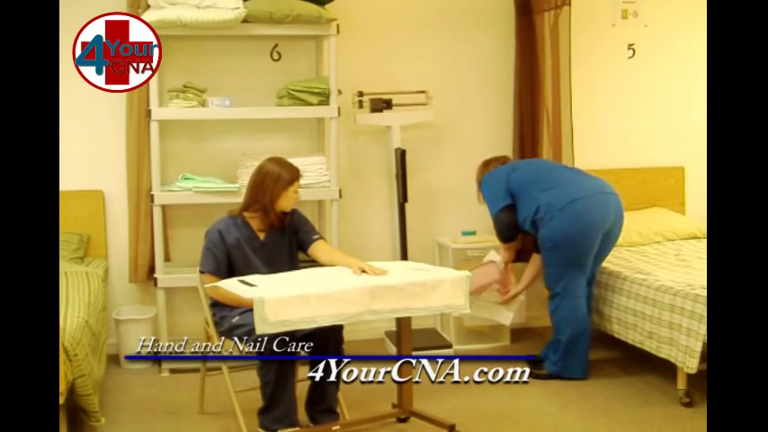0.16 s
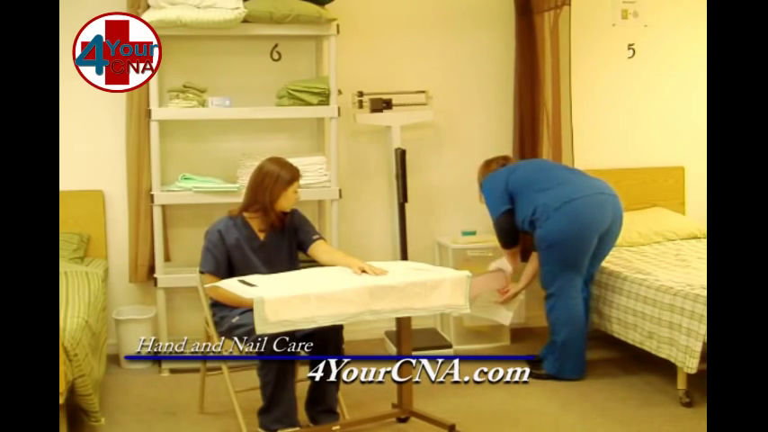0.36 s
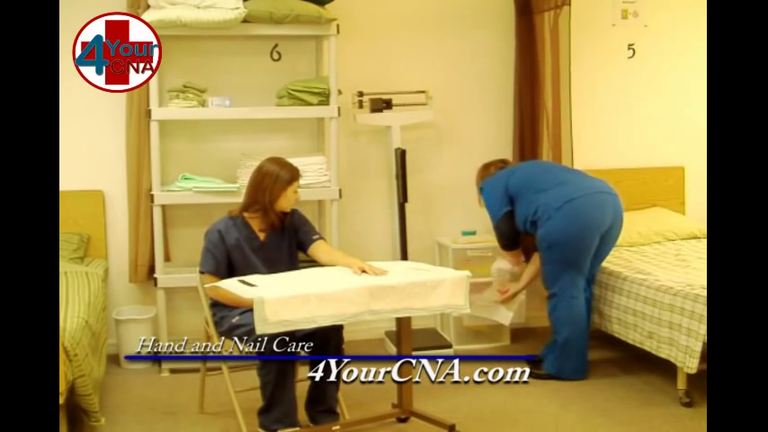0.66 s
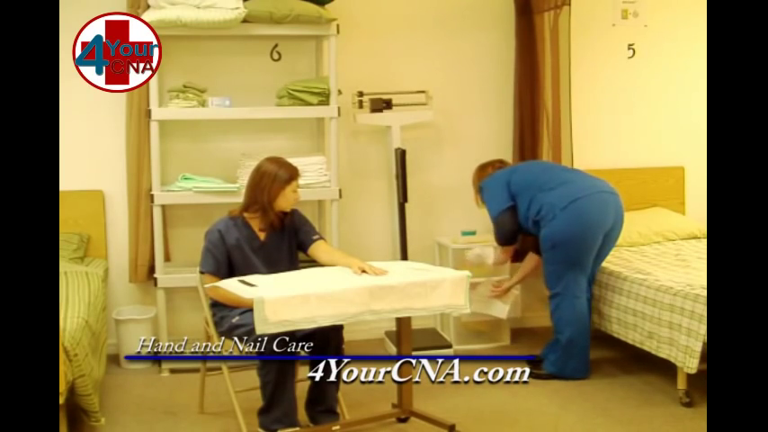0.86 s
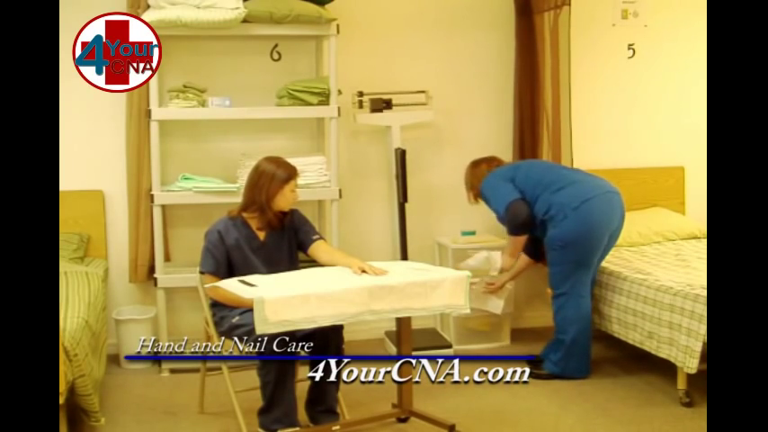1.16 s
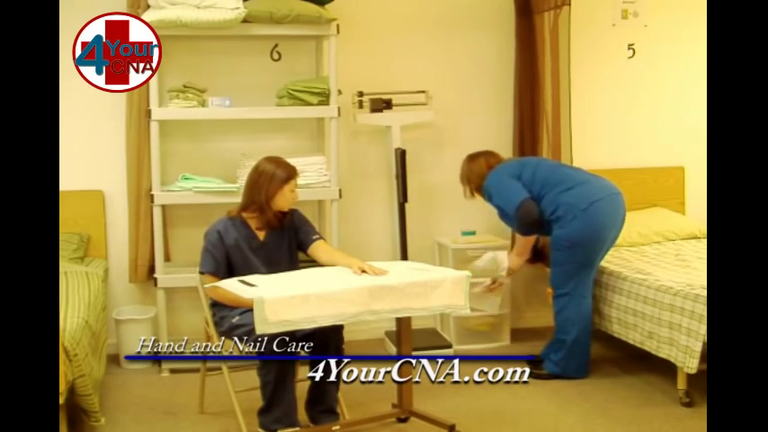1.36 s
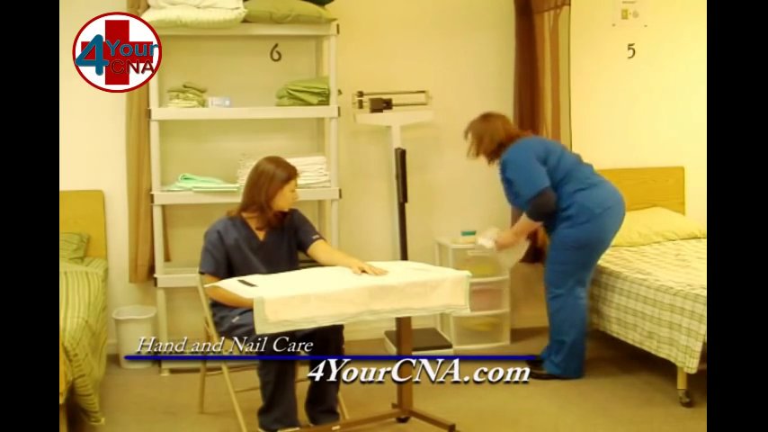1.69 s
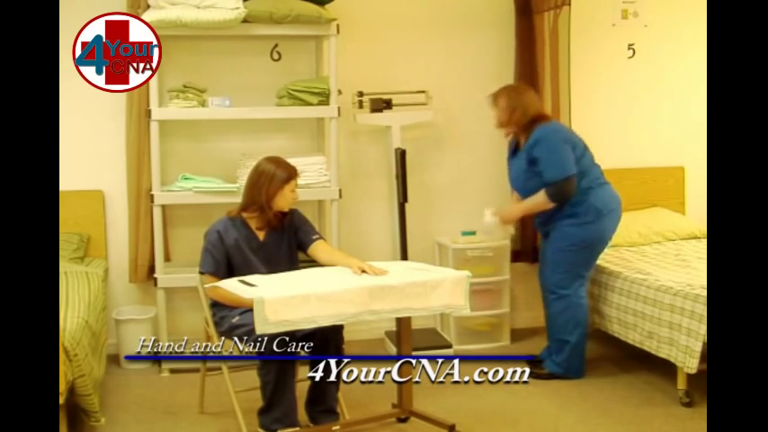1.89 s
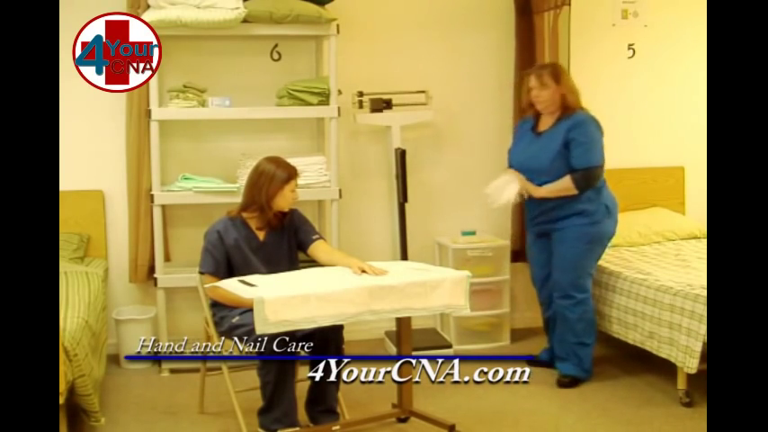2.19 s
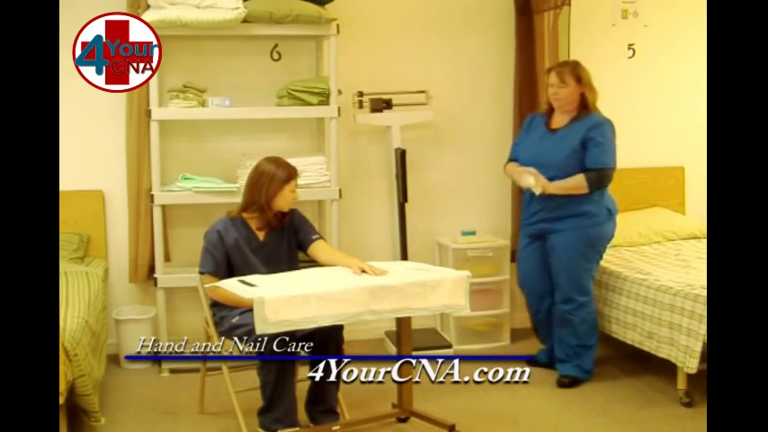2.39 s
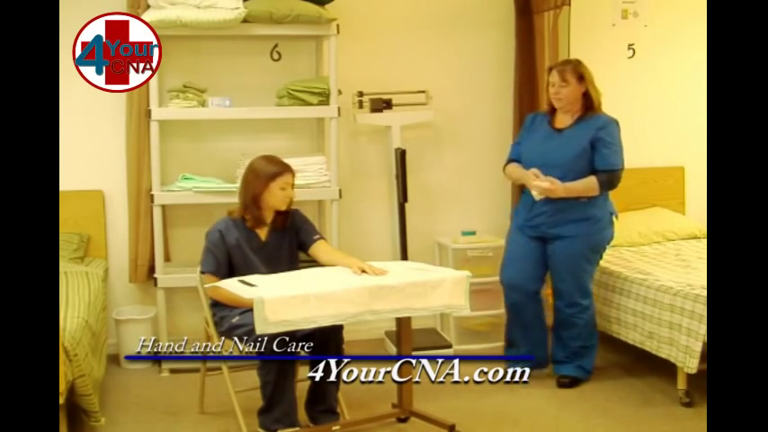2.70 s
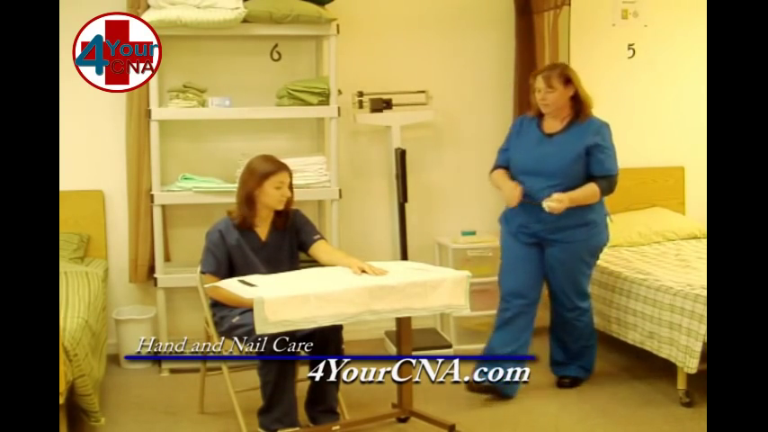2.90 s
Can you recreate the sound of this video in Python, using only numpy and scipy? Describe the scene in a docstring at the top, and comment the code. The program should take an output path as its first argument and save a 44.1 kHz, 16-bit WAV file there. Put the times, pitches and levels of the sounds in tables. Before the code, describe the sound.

A plastic basin with bottles bumps softly into a plastic drawer, then clatters, with sharp cracks near 0.75 and 0.9 seconds and more knocks following. From 1.35 seconds the drawer scrapes shut, stopping with a brief hollow boom around 1.6. A paper towel, rustling faintly until then, is crumpled with small snaps from 1.9 to 3 seconds. Faint ventilation runs throughout in the small room.

```python
"""A plastic basin with bottles in it bumps and clatters into the drawer of a light plastic cabinet,
a few metres from the microphone in a small room. Each knock rings the drawer and clacks its thin walls.
Nudged, the drawer scrapes shut on its runners and leaves the cabinet booming briefly.
A paper towel rustles in the hand throughout and is then crumpled, its creases snapping,
over faint ventilation noise."""
import sys
import numpy as np
from scipy import signal
from scipy.fft import rfft, irfft, next_fast_len
from scipy.io import wavfile
from scipy.ndimage import uniform_filter1d

SR = 44100
rng = np.random.default_rng(int(sys.argv[2]) if len(sys.argv) > 2 else 0)


def transcribe(u):
    """Save the signal u as a 16-bit wav file named by the first command-line argument.

    u: samples, shape (n,) or (channels, n), limited to [-1, 1]; the rate is SR.
    q: integer samples, one column per channel.
    """
    v = np.clip(np.atleast_2d(u).T, -1, 1)
    q = np.round(v * 32767).astype(np.int16)
    wavfile.write(sys.argv[1], SR, q)


N = 134505
RING_ATTACK_S = 0.0028

# The drawer's modes. Each row: frequency in Hz, relative level in dB, t60 in seconds.
DRAWER_MODES = [(86.2, -21.5, 0.71), (146.8, -11.5, 0.21), (230, 0, 0.17), (263.5, 2.5, 0.099),
                (340.4, -2.5, 0.2), (434, -4, 0.13), (557.3, -1, 0.16), (614, -2, 0.082), (797, -15, 0.21),
                (843, -12, 0.082)]


def basin_bumps(thud_t60_s=0.09, puff_db=-2):
    """The hand-damped basin answers a soft push with a dull flex of its floor and a short hollow note."""
    # Pushes into place. Each row: start in seconds, ring gain in dB, thud gain in dB.
    pushes = [(0.001, -38, -34.5), (0.159, -36.5, -51), (0.175, -36.5, -50), (0.329, -31, -38),
              (0.463, -28, -40), (0.481, -36, -41), (0.659, -41, -64), (0.7446, -26, -28.5),
              (1.03, -36.5, -43), (1.2644, -26.5, -20.5), (1.2731, -32, -17.5)]
    # Modes of the basin and of its floor. Each row: frequency in Hz, level in dB, t60 in seconds.
    basin_modes = [(329.7, 3.5, 0.13), (400, -12, 0.08), (569.5, -7, 0.077), (766, -16, 0.21),
                   (877, -11, 0.12), (1773, -13, 0.11)]
    floor_modes = [(88.5, -17.5, 0.21), (149.4, -15, 0.18), (207, -1, 0.089), (420, -1, 0.051)]
    # The noise in the thud. Each row: frequency in Hz, relative level in dB.
    thud_spectrum = [(25, -45), (50, -26), (120, -9), (210, 6), (420, 17), (600, -2), (850, -3),
                     (1500, -12), (4000, -51), (12000, -73)]
    out, t = np.zeros(N), np.arange(SR * 2 // 5) / SR
    attack = 1 - np.exp(-t / RING_ATTACK_S)
    for start, ring_db, thud_db in pushes:
        puff = coloured(rng.standard_normal(len(t)), thud_spectrum) * amp(-60 * t / thud_t60_s) * attack
        thud = ring(floor_modes, t) + amp(puff_db) * puff
        bump = amp(ring_db) * ring(basin_modes, t) + amp(thud_db) * thud
        add(out, start, room(bump, wet_db=-12))
    return out


def knocks(clack_t60_s=0.08, clack_rise_s=0.0016, click_t60_s=0.05, wall_db=-10):
    """Each hard contact rings the drawer, clacks the thin walls and clicks at the hard rim."""
    # Basin, bottles and drawer colliding. Each row: start in seconds, ring, clack and click gains in dB.
    contacts = [(0.282, -47, -39.5, -60), (0.417, -46, -33.5, -35), (0.464, -47, -30, -50),
                (0.485, -40, -31.5, -46), (0.595, -68, -48, -30), (0.665, -62, -44, -27),
                (0.741, -29, -21.5, -29.5), (0.747, -22, -34, -26.5), (0.758, -35, -25.5, -27.5),
                (0.771, -32.5, -38, -32), (0.807, -37, -28.5, -34), (0.825, -32, -27, -28.5),
                (0.863, -32.5, -30, -32), (0.883, -35, -51, -30.5), (0.9023, -33.5, -29, -20),
                (0.907, -39, -32.5, -27), (0.9609, -38, -30, -31), (0.966, -30, -32, -22.5),
                (0.982, -44, -56, -28), (1.05, -39, -28.5, -30), (1.067, -39, -30.5, -42),
                (1.098, -67, -38.5, -42), (1.193, -68, -39.5, -46), (1.231, -40, -28.5, -38),
                (1.264, -26, -27.5, -27), (1.368, -56, -28.5, -51), (1.467, -32, -25, -22),
                (1.509, -33, -29.5, -42), (1.562, -32, -26, -39)]
    # Wall modes that colour a clack. Each row: frequency in Hz, level in dB, t60 in seconds.
    wall_modes = [(1120, -17.5, 0.31), (1351, -2.5, 0.081), (1564, 3, 0.05), (1660, -11, 0.17),
                  (1824, -14, 0.1), (2120, -19.5, 0.25)]
    # Noise of the walls and of the rim. Each row: frequency in Hz, relative level in dB.
    clack_spectrum = [(80, -12.5), (300, 8), (600, 3), (1000, 3), (2100, -3.5), (3000, -1.5), (5000, -8),
                      (8000, -28), (12000, -59)]
    click_spectrum = [(300, -44), (1500, 0), (2600, -2.5), (3700, 1), (4600, 2), (5600, -5.5),
                      (7000, -16.5), (9500, -23), (12000, -62)]
    out, t = np.zeros(N), np.arange(SR * 3 // 5) / SR
    clack_envelope = amp(-60 * t / clack_t60_s) * (1 - np.exp(-t / clack_rise_s))
    click_envelope = amp(-60 * t / click_t60_s)
    for start, drawer_db, clack_db, click_db in contacts:
        chatter = coloured(grains(len(t), per_s=9000), clack_spectrum) * clack_envelope
        clack = chatter + amp(wall_db) * ring(wall_modes, t)
        click = coloured(grains(len(t), per_s=6000), click_spectrum) * click_envelope
        body = room(amp(drawer_db) * ring(DRAWER_MODES, t), wet_db=-7.5)
        clatter = room(amp(clack_db) * clack + amp(click_db) * click, wet_db=-1)
        add(out, start, body + clatter)
    return out


def rim_cracks(edge_t60_s=0.042, pitch_spread=0.062):
    """A hard edge snaps against the drawer: one pressure spike, then a tight cluster of edge modes."""
    # The strikes. Each row: start in seconds, dry peak in dB, ring pitch in Hz, ring level in dB.
    strikes = [(0.7411, -9.5, 1660, -28.5), (0.806, -30, 970, -25), (0.9037, -12.5, 4440, -32),
               (0.9054, -17, 4473, -21), (0.9625, -27, 2170, -23.5)]
    # The spike's colour. Each row: frequency in Hz, relative level in dB.
    crack_spectrum = [(500, -13), (2000, -14), (4500, 10), (6000, -1), (8000, -10), (12000, -11)]
    out, t = np.zeros(N), np.arange(SR // 4) / SR
    spike = coloured(signal.unit_impulse(len(t), SR // 2000), crack_spectrum)
    for start, crack_db, hz, ring_db in strikes:
        crack = amp(crack_db) * spike / spike.max()
        cluster_hz = hz * (1 + pitch_spread * rng.standard_normal(8))
        cycles = np.outer(t, cluster_hz) + rng.random(len(cluster_hz))
        edge = amp(ring_db - 60 * t / edge_t60_s) * unit(np.sin(2 * np.pi * cycles).sum(axis=1))
        add(out, start, room(crack + edge, wet_db=-7.5))
    return out


def drawer_slide(rub_share=0.47, groan_hz=611, sag_hz_per_s=220, waver_hz=34.5, fade_db_per_s=35):
    """The runners stick and slip: the drawer scrapes, shakes and groans on a sinking note to its stop."""
    # Force on the runners. Each row: time in seconds, level in dB.
    force = [(1.35, -47), (1.375, -37.5), (1.40, -29), (1.44, -28.5), (1.46, -34.5), (1.49, -31.5),
             (1.55, -31), (1.59, -35), (1.62, -54), (1.66, -89)]
    # The runners' scrape. Each row: frequency in Hz, relative level in dB.
    scrape_spectrum = [(60, -10), (150, -6), (240, 6), (400, -10), (500, -3), (600, 3.5), (780, 0.5),
                       (1200, -4.5), (2200, -6.5), (3300, -2), (4800, -6), (6500, -17.5), (9500, -28),
                       (12000, -74)]
    # The drawer meets its stop and settles. Each row: start in seconds, gain in dB.
    stops = [(1.559, -22.5), (1.593, -27.5)]
    # The cabinet's boom. Each row: frequency in Hz, level in dB, t60 in seconds.
    cabinet_modes = [(85.7, -21, .8), (155, -2, 0.14), (231, 1, 0.14)]
    t = np.arange(SR * 3 // 5) / SR
    slips = grains(N, per_s=910, spread_db=3)
    friction = np.sqrt(1 - rub_share) * slips + np.sqrt(rub_share) * rng.standard_normal(N)
    shaking = amp(-25) * unit(signal.fftconvolve(friction, ring(DRAWER_MODES, t))[:N])
    sliding_s = np.maximum(np.arange(N) / SR - force[0][0], 0)
    waver = unit(uniform_filter1d(rng.standard_normal(N), size=200))
    pitch = groan_hz - sag_hz_per_s * sliding_s + waver_hz * waver
    groan = amp(-1 - fade_db_per_s * sliding_s) * np.sin(2 * np.pi * np.cumsum(pitch) / SR)
    out = level(force) * (coloured(friction, scrape_spectrum) + shaking + groan)
    for start, db in stops:
        add(out, start, amp(db) * ring(cabinet_modes, t))
    return room(out, wet_db=-12.5)


def paper_towel(hard_squeeze_db=-28.5, hollow_db=-6.5, hollow_exponent=1.56, snap_t60_s=0.016):
    """The towel brushes along while held, then is balled up, fuller the harder it is squeezed."""
    # The hand holding, then crumpling. Each row: time in seconds, relative level in dB.
    holding = [(0, -41), (0.04, -44), (0.06, -39.5), (0.14, -38.5), (0.26, -40.5), (0.32, -36.5),
               (0.38, -43), (0.47, -39), (0.53, -47), (0.57, -35), (0.63, -36), (0.72, -36), (0.85, -45.5),
               (1.1, -44.5), (1.17, -48.5), (1.3, -44), (1.62, -49), (1.74, -74), (1.78, -50.5),
               (1.87, -62)]
    crumpling = [(1.85, -61), (1.872, -36), (1.948, -28.5), (1.996, -37), (2.102, -33.5), (2.175, -46),
                 (2.224, -38), (2.394, -40.5), (2.418, -34.5), (2.46, -32.5), (2.52, -33), (2.562, -35.5),
                 (2.576, -33), (2.70, -39.5), (2.724, -32), (2.796, -37.5), (2.924, -41.5), (2.954, -39),
                 (3.03, -44.5)]
    # Paper held, crumpled and squeezed hard. Each row: frequency in Hz, relative level in dB.
    held_spectrum = [(150, -23.5), (400, -8.5), (900, -10), (1500, -5.5), (2500, -8), (3700, -0.5),
                     (4700, 0.5), (5800, -6), (7200, -14.5), (9700, -15.5), (11500, -23.5)]
    crumpled_spectrum = [(150, -27), (350, -18), (700, -9), (1300, -7), (2200, -0.5), (3100, 2),
                         (4600, 4.5), (5800, -3), (7200, -11), (9700, -14.5), (11500, -30)]
    hollow_spectrum = [(150, -5), (340, -2), (600, 3), (1000, 2.5), (1500, 5.5), (2300, 1), (4000, -1),
                       (9000, -51)]
    # Larger creases giving way. Each row: start in seconds, level in dB.
    snaps = [(1.913, -30), (1.948, -36), (2.4204, -23.5), (2.46, -26), (2.468, -33), (2.497, -24),
             (2.515, -26.5), (2.575, -28.5), (2.642, -28), (2.723, -36)]
    squeeze, t = level(crumpling), np.arange(SR // 8) / SR
    fullness = (squeeze / amp(hard_squeeze_db)) ** hollow_exponent
    hollow = amp(hard_squeeze_db + hollow_db) * fullness * rustle(hollow_spectrum)
    held = level(holding) * rustle(held_spectrum)
    crumpled = amp(-1) * squeeze * rustle(crumpled_spectrum)
    out = held + crumpled + hollow
    for start, db in snaps:
        snap = coloured(rng.standard_normal(len(t)), crumpled_spectrum)
        add(out, start, amp(db - 60 * t / snap_t60_s) * snap)
    return room(out, wet_db=-10.5)


def rustle(spectrum, crease_share=0.51):
    """Snapping creases over the smooth hiss of rubbing sheets."""
    creases = np.sqrt(crease_share) * grains(N, per_s=1500)
    hiss = np.sqrt(1 - crease_share) * rng.standard_normal(N)
    return coloured(creases + hiss, spectrum)


def ventilation(air_db=-50):
    """Room tone: steady air noise with a faint hum."""
    # Moving air. Each row: frequency in Hz, relative level in dB.
    air_spectrum = [(20, -6), (50, -4), (125, 5), (180, -6.5), (300, -12), (1200, -13), (2800, -14.5),
                    (4300, -12.5), (6000, -21), (8000, -26), (11000, -24)]
    # The hum. Each row: frequency in Hz, rms level in dB.
    hum_tones = [(118.5, -65.5)]
    t = np.arange(N) / SR
    hum = sum(amp(db) * np.sqrt(2) * np.sin(2 * np.pi * hz * t) for hz, db in hum_tones)
    return amp(air_db) * coloured(rng.standard_normal(N), air_spectrum) + hum


def room(x, wet_db):
    """The direct sound plus the small room's diffuse tail, each band dying at its own speed."""
    # Reverberation. Each row: frequency in Hz, t60 in seconds.
    decay_times = [(100, 0.35), (400, 0.35), (2000, 0.22), (5000, 0.26), (10000, 0.21)]
    hz, t, bands = signal.stft(rng.standard_normal(SR // 2), SR, nperseg=256)
    decay = amp(-60 * t / along(decay_times, hz)[:, None])
    tail = signal.istft(bands * decay, SR, nperseg=256)[1]
    tail = np.pad(tail / np.linalg.norm(tail), (SR // 400, 0))  # 2.5 ms behind the direct sound
    return x + amp(wet_db) * signal.fftconvolve(x, tail)[:len(x)]


def ring(modes, t, scatter_db=2.5, detune=0.012):
    """Damped modes, a little different in strength and pitch at every blow as the plastic flexes."""
    tone = np.zeros(len(t))
    for hz, db, t60 in modes:
        envelope = amp(db + scatter_db * rng.standard_normal() - 60 * t / t60)
        pitch = hz * (1 + detune * rng.standard_normal())
        tone += envelope * np.sin(2 * np.pi * pitch * t)
    return tone * (1 - np.exp(-t / RING_ATTACK_S))


def grains(size, per_s, spread_db=1.5):
    """Random impulses of uneven strength, at rms 1."""
    fires = rng.random(size) < per_s / SR
    strength = amp(spread_db * np.clip(rng.standard_normal(size), -2, 2))
    polarity = np.sign(rng.standard_normal(size))
    return unit(fires * polarity * strength)


def coloured(x, spectrum):
    """x filtered by (Hz, dB) points, at rms 1."""
    size = next_fast_len(len(x) + 4096)
    gain = amp(along(spectrum, np.fft.rfftfreq(size, 1 / SR)))
    return unit(irfft(rfft(x, size) * gain, size)[:len(x)])


def level(points):
    """Gain per sample from (seconds, dB) points: silent before the first, holding the last."""
    times, db = np.transpose(points)
    return amp(np.interp(np.arange(N) / SR, times, db, left=-120))


def along(points, hz):
    """(Hz, value) points interpolated on a log frequency axis."""
    frequencies, values = np.transpose(points)
    return np.interp(np.log(hz + 1), np.log(frequencies + 1), values)


def amp(db):
    """Decibels to gain."""
    return 10 ** (np.asarray(db) / 20)


def unit(x):
    """Scaled to rms 1."""
    return x / np.sqrt(np.mean(x ** 2) + 1e-20)


def add(track, start_s, sound):
    """Mix a sound into the track at a time."""
    start = max(0, round(start_s * SR))
    track[start:start + len(sound)] += sound[:N - start]


def scene():
    """Basin, drawer, towel and room tone as they reach one microphone."""
    return (basin_bumps() + knocks() + rim_cracks() + drawer_slide() + paper_towel() + ventilation())[None]


def record(dry, top_hz=12231):
    """The microphone rolls off the top of the treble; nothing passes above the band limit."""
    # Microphone response. Each row: frequency in Hz, gain in dB.
    response = [(9500, 0.46), (10500, -6.5), (11300, -5.5), (12200, -28)]
    size = next_fast_len(N + 4096)
    hz = np.fft.rfftfreq(size, 1 / SR)
    gain = amp(along(response, hz)) * (hz < top_hz)
    return irfft(rfft(dry, size) * gain, size)[..., :N]


dry = scene()
out = record(dry)
transcribe(out)
```